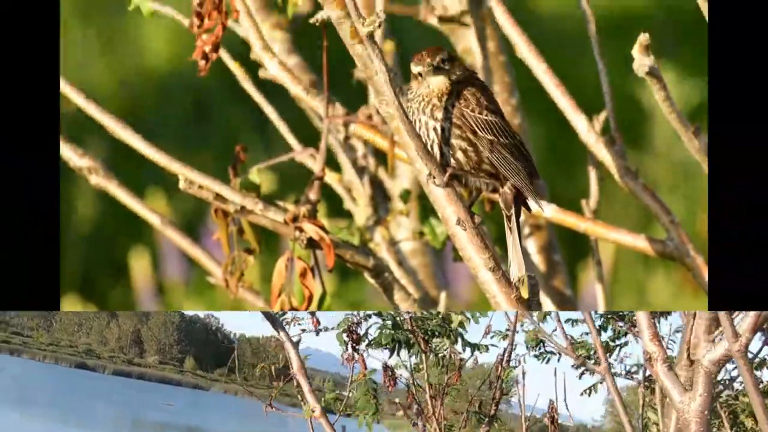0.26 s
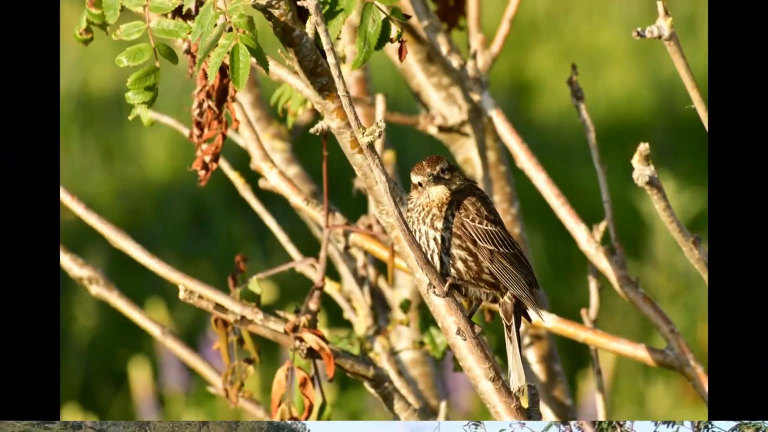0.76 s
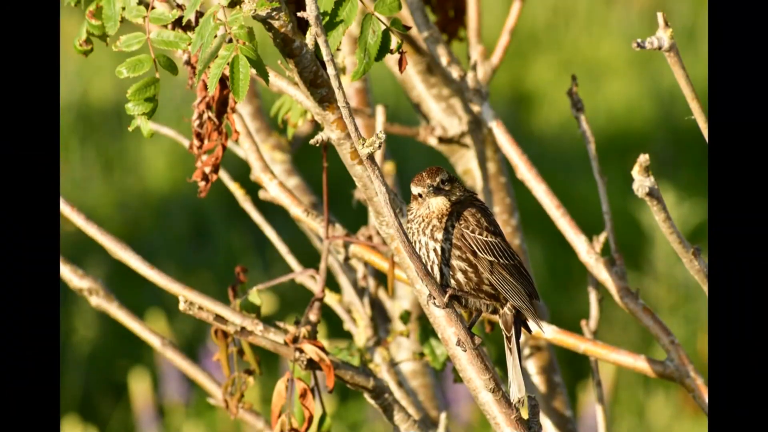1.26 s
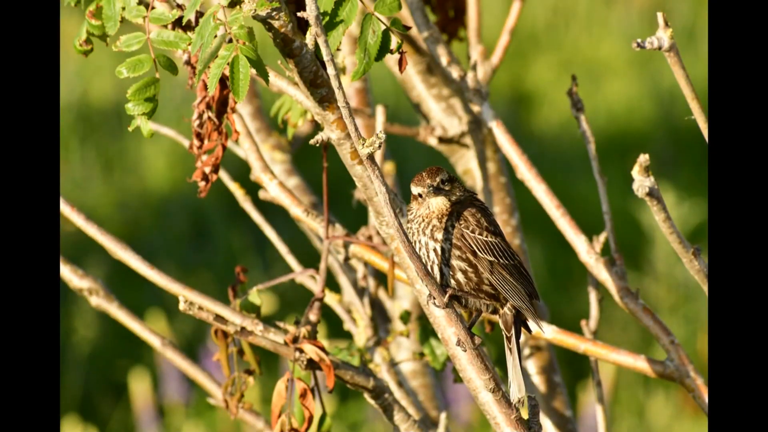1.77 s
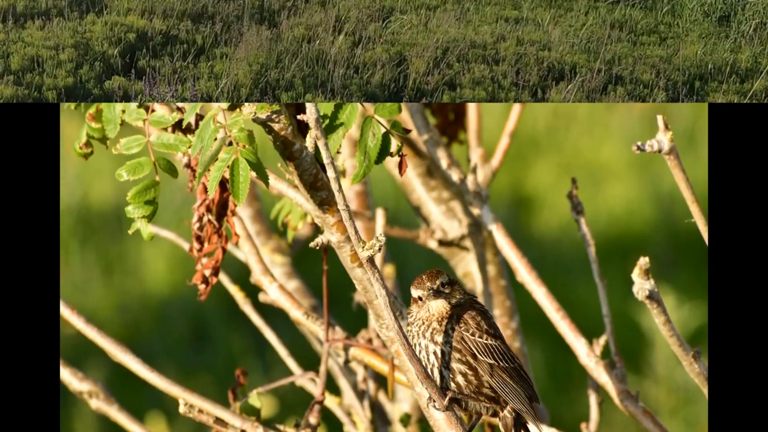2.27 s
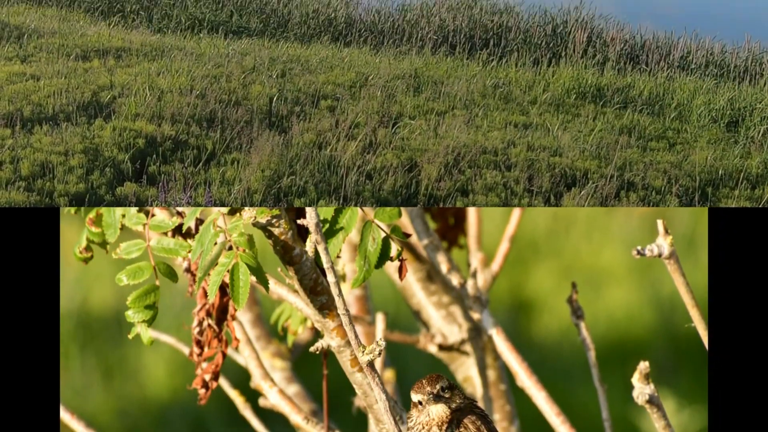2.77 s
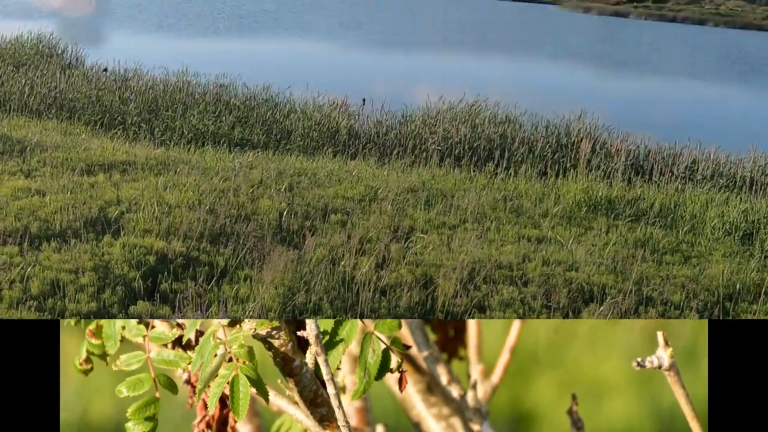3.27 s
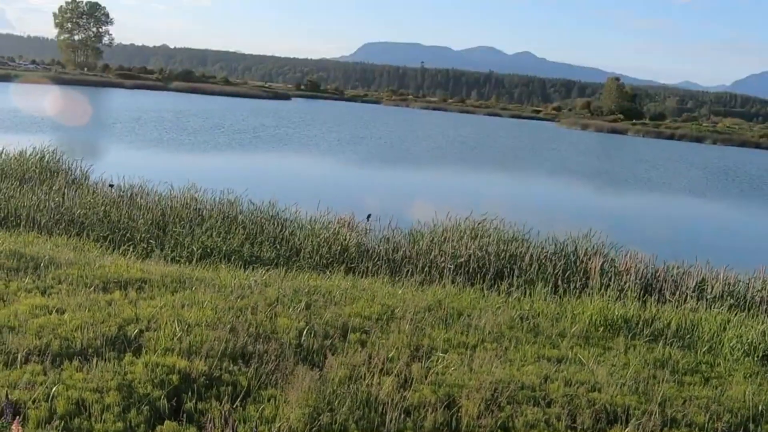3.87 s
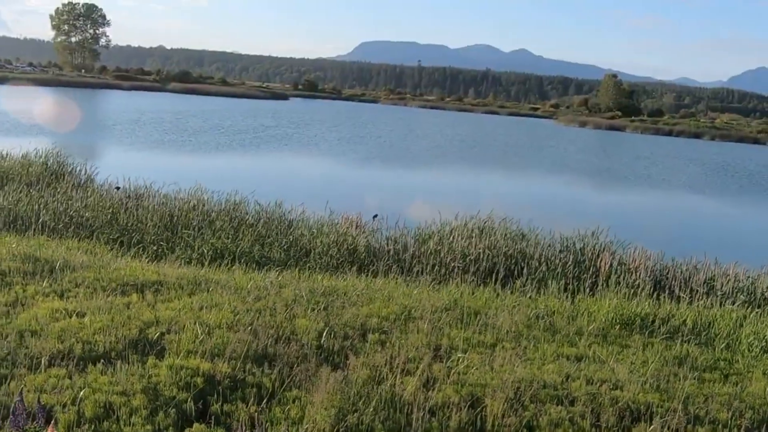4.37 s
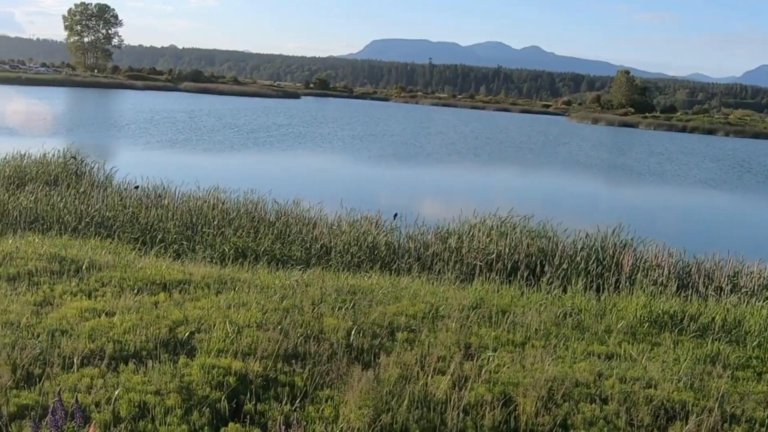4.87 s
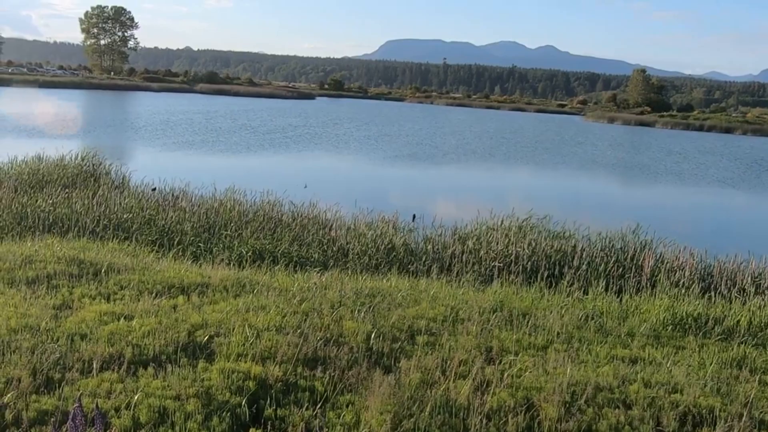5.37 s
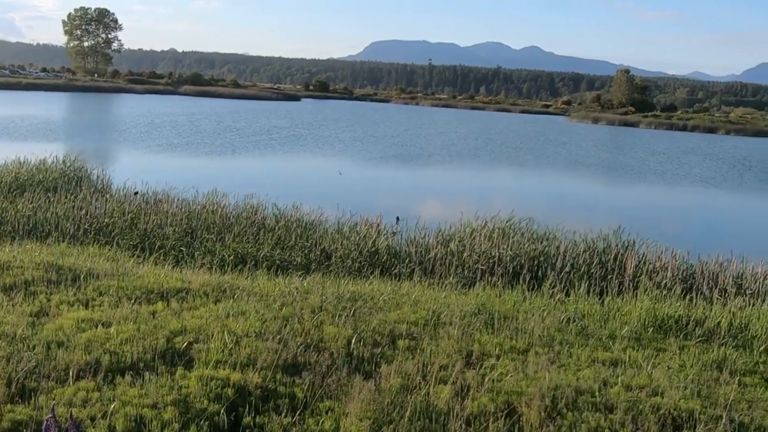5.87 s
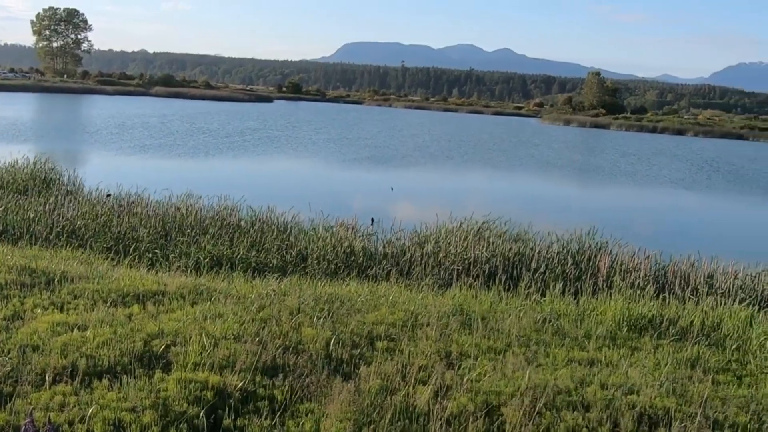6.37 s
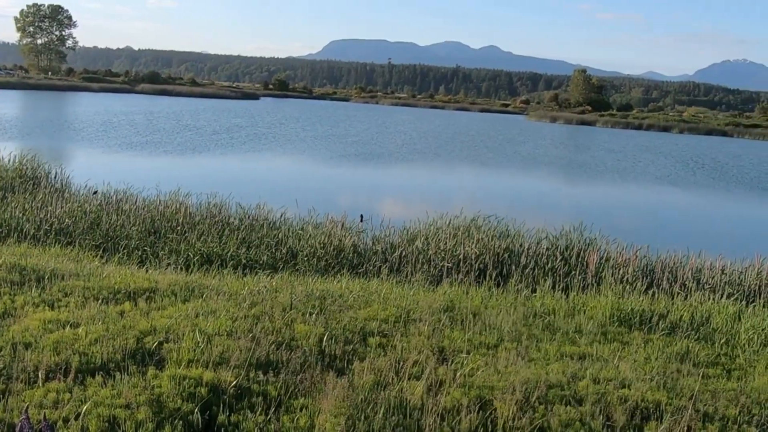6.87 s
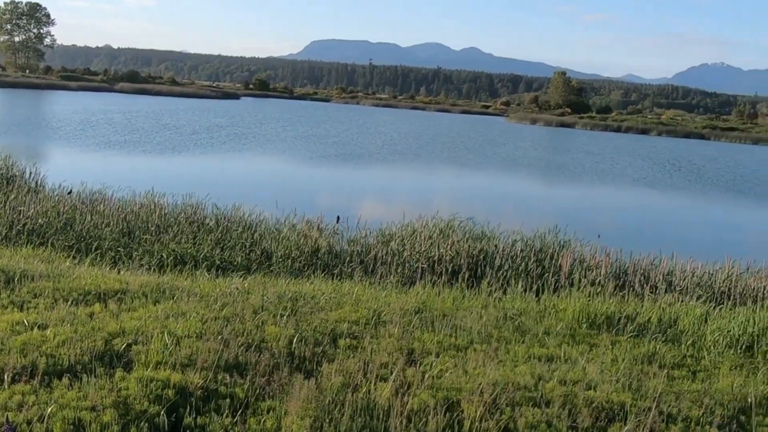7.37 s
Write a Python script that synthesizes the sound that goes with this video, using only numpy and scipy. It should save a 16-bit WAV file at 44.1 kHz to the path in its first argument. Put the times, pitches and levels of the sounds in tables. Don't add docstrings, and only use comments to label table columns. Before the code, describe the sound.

A low, steady haze of distant traffic and air, with slight wind rumble, lies under an open marsh. At 0 s a high bird note is dying away while far birds flick and pipe softly. From 0.15 s a close songbird begins quietly, sliding through arches, small drops and V-shaped whistles around 3 to 4 kHz, reaching full voice by 1.5 s and stopping near 2.65 s. Behind it, far birds sweep, chip, buzz and trill. A crow caws hoarsely at 2.5 and softer at 3.4 s. From 3.5 s the close bird restarts faintly: quick rise, steep plunge, held whistle, low blip, about three a second, quickening to over five and slightly lowering in pitch. A dull bump falls near 4.45 s. From 6 s to the 7.5 s end the song is piercing, with overload fizz, short echoes and a long tree-line tail; faint high far whistles close.

```python
import sys
import numpy as np
from scipy import signal
from scipy.fft import rfft, irfft, next_fast_len
from scipy.io import wavfile
from scipy.ndimage import uniform_filter1d, map_coordinates

SR = 44100
rng = np.random.default_rng(int(sys.argv[2]) if len(sys.argv) > 2 else 0)


def amp(db):
    return 10 ** (np.asarray(db, float) / 20)


def write(x):
    x = np.atleast_2d(x).T
    wavfile.write(sys.argv[1], SR, np.round(np.clip(x, -1, 1) * 32767).astype(np.int16))


N = 335601


def unit(x):
    return x / np.sqrt(np.mean(x ** 2) + 1e-20)


def along(points, hz):
    f, v = np.transpose(points)
    return np.interp(np.log(hz + 1), np.log(f + 1), v)


def wobble(rate, size):
    knots = rng.standard_normal(int(size * rate / SR) + 4)
    return map_coordinates(knots, [np.arange(size) * rate / SR])


def noise_pair():
    return rng.standard_normal((2, N))


def spread(pair, spectrum, alike):
    length = pair.shape[1]
    m = next_fast_len(length + 8192)
    hz = np.fft.rfftfreq(m, 1 / SR)
    turn = np.arccos(np.clip(along(alike, hz), -1, 1)) / 2
    coloured = rfft(pair, m) * amp(along(spectrum, hz))
    mid, side = irfft(coloured * [np.cos(turn), np.sin(turn)], m)[:, :length]
    return np.array([mid + side, mid - side])


# (pitch f/Hz, level/dB)
THROAT_FADE = [(2600, 3.6), (3600, -1.3), (4100, -5.5), (4800, -12.5), (6500, -30.5)]


def add_whistle(track, rows, partials, flutter_db, smooth_s=0.00064, push=0.9):
    s, hz, db = np.transpose(rows)
    t = np.arange(s[0] - .003, s[-1] + 0.0038, 1 / SR)
    level_s = np.r_[t[0], s, t[-1]]
    level_db = np.r_[db[0] - 25, db, db[-1] - 25]
    size = max(int(smooth_s * SR), 1)
    flutter = flutter_db * wobble(220, len(t))
    gain = uniform_filter1d(amp(np.interp(t, level_s, level_db) + flutter), size)
    hz = uniform_filter1d(np.interp(t, s, hz), size)
    turn = 2 * np.pi * (np.cumsum(hz) / SR + rng.random())
    throat_db = along(THROAT_FADE, hz) + 2.5e-5 * np.minimum(np.gradient(hz) * SR, 0)
    wave = np.cos(turn)
    for k, db_k in partials:
        wave = wave + amp(db_k + throat_db) * gain ** (push * (k - 1)) * np.cos(k * turn)
    part = track[round(t[0] * SR):][:len(t)]
    part += (gain * wave)[:len(part)]


# (f/Hz, level/dB per Hz)
HAZE_COLOUR = [(15, -74), (25, -37), (101, -13), (227, -12.5), (389, -0.5), (648, -14), (2010, -21),
               (2420, -22), (2850, -16), (3340, -11), (3930, -24.5), (6730, -31), (10100, -47),
               (11800, -66), (15500, -68)]
# (f/Hz, likeness 0-1)
HAZE_ALIKE = [(30, .999), (150, 0.98), (500, .997), (3000, 1), (9000, 1)]
# (f/Hz, level/dB)
MACHINE_HUM = [
    (101, -65),
    (152, -67),
]
# (t/s, level/dB)
WIND_RUMBLE = [(0.0, -60), (.5, -61), (.8, -70), (1.8, -78), (2.4, -66), (2.7, -72), (3.3, -84),
               (3.52, -58), (3.75, -65), (3.9, -60), (4.2, -60), (4.7, -65), (5.2, -69), (5.9, -68),
               (6.3, -62), (6.82, -58), (7.61, -72)]


def haze():
    roar = amp(-45 + 0.46 * wobble(2.7, N)) * unit(spread(noise_pair(), HAZE_COLOUR, HAZE_ALIKE))
    wind_colour = [(12, -32.5), (22, -5.0), (52, -1.5), (75, -29.5), (150, -95.5)]
    wind = unit(spread(noise_pair(), wind_colour, HAZE_ALIKE))
    wind_db = np.interp(np.arange(N) / SR, *np.transpose(WIND_RUMBLE))
    hum = np.zeros(N)
    for hz, db in MACHINE_HUM:
        drift = np.cumsum(1 + .02 * wobble(5, N)) / SR
        hum += amp(db + 2.7 * wobble(4.4, N)) * np.sin(2 * np.pi * hz * drift)
    return roar + hum + amp(wind_db) * wind


def earlier_song():
    b, a = signal.butter(2, [4050 / SR * 2, 4330 / SR * 2], "band")
    decay_db = -39.5 - 18 * np.arange(N) / SR
    return unit(signal.lfilter(b, a, rng.standard_normal(N))) * amp(decay_db)


# (t/s, level/dB)
FLICKS_AT = [
    (.04, -29),
    (.265, -29),
    (.493, -29),
    (.752, -37),
    (5.398, -36.5),
]
# (length t/s, start f/Hz, end f/Hz)
FLICK_GLIDE = (.023, 4900, 4150)
# (t/s, length t/s, start f/Hz, end f/Hz, level/dB)
FAR_WHISTLES = [(2.691, 0.077, 5140, 3840, -49), (3.22, .032, 3770, 3880, -46.5),
                (3.578, 0.039, 5200, 4900, -46), (3.624, 0.039, 3800, 3680, -38.5),
                (3.945, 0.12, 5200, 3830, -52), (4.418, .055, 5100, 4200, -37),
                (5.08, 0.065, 4950, 3600, -35), (5.252, .05, 5500, 3850, -35),
                (5.787, .09, 3190, 2506, -43), (4.685, 0.038, 2620, 3130, -45),
                (5.32, .065, 2217, 2850, -48.5), (5.631, 0.05, 2156, 2770, -49.5),
                (7.29, 0.092, 5750, 5620, -40), (7.447, 0.043, 5760, 5730, -37),
                (7.597, .026, 5750, 5720, -42.5)]


def far_whistles(far):
    calls = FAR_WHISTLES + [(s, *FLICK_GLIDE, db) for s, db in FLICKS_AT]
    for s, length, hz, end_hz, db in calls:
        rows = [(s, hz, db - 7.0),
                (s + 0.2 * length, .74 * hz + .26 * end_hz, db),
                (s + 0.62 * length, .24 * hz + .76 * end_hz, db - .5),
                (s + length, end_hz, db - 5)]
        add_whistle(far, rows, [], flutter_db=2)


def blur(x):
    t = np.arange(SR // 20) / SR
    smear = rng.standard_normal(len(t)) * amp(-60 * t / .05)
    return x + .35 * signal.fftconvolve(x, smear / np.linalg.norm(smear))[:N]


# (t/s, length t/s, f/Hz, level/dB)
PIPED_NOTES = [
    (0.068, .106, 2950, -34.5),
    (0.197, 0.028, 2727, -36),
    (0.29, .108, 2960, -33.5),
    (0.423, 0.024, 2720, -34.5),
    (.52, 0.104, 2845, -35),
    (0.657, 0.022, 2660, -39),
    (.788, 0.088, 2895, -36),
    (4.867, 0.049, 2760, -46),
    (5.194, 0.054, 2690, -41),
]


def far_pipes(far):
    for s, length, hz, db in PIPED_NOTES:
        rows = [(s, .9 * hz, db - 8.0),
                (s + 0.12 * length, .98 * hz, db),
                (s + .5 * length, hz, db),
                (s + 0.87 * length, .985 * hz, db),
                (s + length, .87 * hz, db - 5)]
        add_whistle(far, rows, [], flutter_db=.5)


# (multiple, level/dB at full voice)
SONG_OVERTONES = [(2, -20.5), (3, -38), (4, -56)]
# (start t/s, end t/s, first f/Hz, last f/Hz, peak level/dB)
ARCH_NOTES = [
    (.148, .2005, 3460, 3610, -16.5),
    (.528, .6016, 3160, 3287, -10),
    (.9234, .9997, 3007, 3100, -7),
    (1.2746, 1.3604, 2915, 3001, -4),
    (1.6228, 1.7156, 2834, 2962, -2.5),
    (1.975, 2.0705, 2838, 2935, -2.4),
    (2.3362, 2.4305, 2799, 2923, -2.5),
]
DROP_NOTES = [
    (.2085, .2405, 3455, 3266, -11),
    (.34, .369, 3760, 3670, -17),
    (.6065, .6206, 3240, 3200, -11.5),
    (.6211, .6415, 3140, 3030, -8),
    (1.0097, 1.0431, 3000, 2837, -11),
    (1.3659, 1.4013, 2893, 2735, -7),
    (1.7161, 1.754, 2875, 2700, -8),
    (2.0693, 2.1107, 2840, 2634, -6.5),
    (2.436, 2.478, 2800, 2640, -10.5),
]
FALL_NOTES = [
    (.312, .3385, 4253, 3953, -8),
    (1.096, 1.153, 3630, 3050, -3),
    (1.4402, 1.5091, 3637, 2987, -2.5),
    (1.7909, 1.8568, 3560, 2997, -1.5),
    (2.1471, 2.2145, 3572, 2903, 2),
    (2.5113, 2.5821, 3483, 2887, -1.5),
]
CLIMB_NOTES = [
    (.3886, .4195, 4027, 4167, -6.5),
    (1.1599, 1.2078, 3237, 3623, -3.5),
    (1.5166, 1.5664, 3190, 3613, -1),
    (1.8707, 1.9216, 3213, 3550, -1),
    (2.2254, 2.2743, 3194, 3545, 3),
    (2.5896, 2.6415, 3189, 3484, -1.1),
]
SOFT_FALL_NOTES = [
    (.706, .7655, 4080, 3250, -7.5),
]
SOFT_CLIMB_NOTES = [
    (.777, .824, 3510, 3930, -9.5),
]
# (share of length, share of way from first to last f, level/dB re peak)
ARCH_UNFOLDS = [(0, -0.15, -15.5), (.14, -0.19, -5), (.28, .55, -2.2), (.48, .93, -0.3), (.88, 1.01, -1.5),
                (1, 1.6, -18.5)]
DROP_UNFOLDS = [(0, 0.035, -15), (.27, 0.2, 0.1), (.85, 1.03, -2), (1, 1.14, -16.5)]
FALL_UNFOLDS = [(0, -.03, -15), (.13, .01, -4), (.26, .09, -1.2), (.42, .24, -.6), (.6, .6, -0.8),
                (.78, .88, -2), (.9, 1.01, -3), (1, 0.95, -19.5)]
CLIMB_UNFOLDS = [(0, -0.274, -17), (.1, -.14, -8), (.25, .02, -4), (.4, .27, -1.2), (.65, .65, -0.37),
                 (.89, 1.01, -1.5), (1, 1.1, -22)]
SOFT_FALL_UNFOLDS = [(0, 0, -22), (.1, .12, -15), (.3, .36, -12), (.5, .58, -1), (.8, .93, -1),
                     (.93, .98, -.5), (1, 1, -18)]
SOFT_CLIMB_UNFOLDS = [(0, -.1, -18), (.08, 0, -7), (.33, .3, -.5), (.62, .63, -2), (.76, .78, -11),
                      (1, 1, -18)]


def slurs(song):
    kinds = [(ARCH_NOTES, ARCH_UNFOLDS), (DROP_NOTES, DROP_UNFOLDS),
             (FALL_NOTES, FALL_UNFOLDS), (CLIMB_NOTES, CLIMB_UNFOLDS),
             (SOFT_FALL_NOTES, SOFT_FALL_UNFOLDS), (SOFT_CLIMB_NOTES, SOFT_CLIMB_UNFOLDS)]
    for notes, shape in kinds:
        for s, end, hz, last_hz, db in notes:
            rows = [(s + u * (end - s), hz + way * (last_hz - hz), db + rel) for u, way, rel in shape]
            add_whistle(song, rows, SONG_OVERTONES, flutter_db=.3, smooth_s=.003)


# (f/Hz, likeness 0-1)
SCATTER_ALIKE = [(2000, 0.84), (5000, 0.91), (10000, 0.37)]
# (f/Hz, level/dB per Hz)
BREATH_COLOUR = [(1200, -25), (2200, -3.5), (5500, -1), (8500, -12), (11500, -26), (13500, -41)]


def breath(song):
    effort = np.sqrt(np.abs(uniform_filter1d(song ** 2, int(.03 * SR))))
    return amp(-40) * effort ** 0.68 * unit(spread(noise_pair(), BREATH_COLOUR, SCATTER_ALIKE))


# (delay t/s, left level/dB, right level/dB)
RETURNS = [
    (.009, -21.5, -34),
    (0.0196, -21.5, -29),
    (.034, -35.5, -33.5),
]


def echoes(x):
    total = np.zeros((2, N))
    for s, left_db, right_db in RETURNS:
        total += amp([[left_db], [right_db]]) * np.pad(x, (round(s * SR), 0))[:N]
    return total


# (f/Hz, t60/s)
TREE_DECAY = [(2500, 2.52), (4000, 2.28), (7000, 1.5), (11000, 0.84)]


def trees(x):
    hz, t, z = signal.stft(rng.standard_normal((2, 3 * SR)), SR, nperseg=256)
    far_lines = amp(-60 * t / along(TREE_DECAY, hz)[:, None])
    reeds = 0.67 * amp(-60 * t / 0.07)
    trunks = amp(3 * rng.standard_normal(len(t)))
    wash = signal.istft(z * (far_lines + reeds) * trunks, SR, nperseg=256)[1]
    tail = spread(wash, [(1000, -4.5), (4000, -3.0), (8000, -0.5), (14000, -2)], SCATTER_ALIKE)
    late = np.pad(x, (150, 0))[None]
    return signal.fftconvolve(late, tail / np.linalg.norm(tail[0]), axes=1)[:, :N]


# (start f/Hz, end f/Hz)
SWEEP_GLIDE = (6150, 3850)
SWEEP_LEVELS = [-47, -38, -40, -36, -36, -34, -32, -33, -33, -31]


def far_sweeps(far):
    first_s, every_s, length_s = 1.045, .118, .037
    start_hz, end_hz = SWEEP_GLIDE
    for k, db in enumerate(SWEEP_LEVELS):
        s = first_s + k * every_s
        add_whistle(far, [(s, start_hz, db - 6), (s + length_s, end_hz, db)], [], flutter_db=4)


# (t/s, level/dB)
CHIPS_AT = [
    (1.058, -48),
    (1.135, -42),
    (1.157, -53.5),
    (1.278, -38.5),
    (1.3, -48),
    (1.425, -41.5),
    (1.45, -41),
    (1.572, -38),
    (1.598, -40.5),
]


def far_chips(far):
    for s, db in CHIPS_AT:
        for hz in (5550, 5100, 4650):
            add_whistle(far, [(s, hz, db), (s + .008, .975 * hz, db)], [], flutter_db=3)


# (t/s, length t/s, f/Hz, level/dB)
BUZZ_PATCHES = [
    (1.075, .035, 3950, -41),
    (1.2, .04, 4000, -37),
    (1.32, .06, 3850, -36),
    (1.485, .05, 3900, -33),
    (1.56, .03, 3950, -37),
    (1.67, .04, 3950, -37),
    (1.78, .045, 4150, -32),
    (1.92, .06, 4400, -32),
    (2.02, .035, 3800, -36),
]
BUZZ_BANDS = [-290, -20, 240]


def far_buzzes(far):
    for s, length, mid_hz, db in BUZZ_PATCHES:
        for hz in np.add(mid_hz, BUZZ_BANDS):
            rows = [(s, .98 * hz, db - 12), (s + length / 2, hz, db), (s + length, 1.01 * hz, db - 12)]
            add_whistle(far, rows, [], flutter_db=6)


CREST, TROUGH = .945, .995
# (f/Hz, level/dB per Hz)
FIZZ_COLOUR = [(6000, -40), (8500, -6), (11000, 0), (14500, -2), (16500, -10)]


def fizz(dry):
    hang_s = .04
    excess = np.maximum(np.abs(dry) - CREST, 0)
    over = np.abs(uniform_filter1d(excess, int(hang_s * SR), axis=1))
    hiss = unit(spread(noise_pair(), FIZZ_COLOUR, [(9000, .93)]))
    return amp(-21 + 3 * wobble(60, N)) * over * hiss


# (t/s, level/dB)
TRILLS_AT = [
    (2.352, -34.5),
    (2.648, -36),
    (2.966, -41.5),
    (3.325, -46.5),
    (3.735, -42),
]


def far_trills(far):
    for start_s, db in TRILLS_AT:
        for k in range(4):
            s = start_s + k * .0185
            add_whistle(far, [(s, 5170, db - 2), (s + .012, 5060, db - 1)], [], flutter_db=4)
            add_whistle(far, [(s + .013, 4550, db - 12), (s + .017, 4200, db - 12)], [], flutter_db=2)


# (t/s from its start, f/Hz, level/dB, warble depth 0-1, mouth f/Hz)
CAW_COURSE = [
    (0, 335, -58, 0, 1700),
    (.026, 451, -44, 0, 1950),
    (.09, 441, -44, .006, 2000),
    (.135, 415, -42, .03, 2080),
    (.22, 384, -41, .05, 1940),
    (.31, 354, -43, .052, 1800),
    (.335, 290, -52, .06, 1480),
]
# (t/s, level/dB, mouth shift f/Hz)
CAWS_AT = [
    (2.53, -2, -20),
    (3.396, -5, 0),
]


def crow():
    warble_hz, rasp_db, narrows = 46, 45, 6
    out, t = np.zeros(N), np.arange(N) / SR
    for start, level_db, shift_hz in CAWS_AT:
        s, *columns = np.transpose(CAW_COURSE)
        s = s + start
        hz, db, warble, mouth_hz = [np.interp(t, s, column) for column in columns]
        beat = 2 * np.pi * np.cumsum(warble_hz * (1 + .15 * wobble(25, N))) / SR
        turn = 2 * np.pi * np.cumsum(hz * (1 + warble * np.sin(beat) + .009 * wobble(90, N))) / SR
        width_hz = np.maximum(.65 - narrows * warble, .2) * hz
        stack = np.zeros(N)
        for k in range(3, 7):
            chest = 1 / (1 + ((k * hz - 1300) / 190) ** 2)
            mouth = 1 / (1 + ((k * hz - mouth_hz - shift_hz) / width_hz) ** 2)
            stack += np.sin(k * turn) * (chest * amp(-300 * warble) + mouth)
        rasp = rasp_db * warble * np.cos(beat) + 2.4 * wobble(70, N)
        out += amp(db + level_db + rasp) * stack * (t > s[0]) * (t < s[-1])
    return out


# (t/s of steepest fall, held t/s, held f/Hz, plunge level/dB, end level/dB)
PLUNGE_NOTES = [(3.5265, .059, 3510, -32, -11.5), (3.8615, .054, 3500, -25, -8),
                (4.1897, .057, 3490, -12, -3.5), (4.4601, 0.061, 3473, -19.5, -5.5),
                (4.7216, .059, 3420, -14, -3.5), (4.965, 0.06, 3380, -10, -4),
                (5.204, 0.064, 3378, -15.5, -8.5), (5.4611, 0.059, 3372, -10.5, -3.5),
                (5.679, .065, 3238, -8, -3.3), (5.875, 0.062, 3026, -3, -4.5),
                (6.0636, .066, 2935, 2.2, -3.5), (6.249, 0.067, 2906, 1.6, -3.5),
                (6.4346, 0.07, 2876, 1.55, -5.5), (6.616, .071, 2776, 0.4, -4.5),
                (6.7984, 0.071, 2770, 3, -6), (6.9823, 0.07, 2768, 1.9, -8), (7.166, .071, 2776, 1.1, -6.5)]
# (t/s from steepest fall, share of way from held pitch to top)
PLUNGE_COURSE = [(-.021, .95), (-.016, 1), (-.012, .99), (-.008, .92), (-.004, .74), (-.001, .51),
                 (.001, .28), (.003, .145)]
PLUNGE_LEVELS = [-37, -27, -21, -14.5, -5.5, 0.6, -2.5, -6]
# (t/s, share of way to top)
SETTLE_COURSE = [(.006, .09), (.011, .054), (.02, .022), (.038, 0)]


def plunge(song, s, held, hz, db, end_db):
    top_hz = 6750 - 0.75 * (3500 - hz)
    rows = []
    for (dt, share), rel in zip(PLUNGE_COURSE, PLUNGE_LEVELS):
        rows.append((s + dt, hz + share * (top_hz - hz), db + rel * hz / 3300))
    dip_db = -12.5 + 0.5 * db
    for dt, share in SETTLE_COURSE:
        swell = ((dt - .006) / (held - .014)) ** .32
        rows.append((s + dt, hz + share * (top_hz - hz), dip_db + (end_db - dip_db) * swell))
    end = s + held
    rows += [(end - .008, 1.003 * hz, end_db), (end - .005, 1.02 * hz, end_db),
             (end - .002, 1.146 * hz, end_db - 3.0), (end + 0.00087, 1.1 * hz, end_db - 19.5)]
    add_whistle(song, rows, SONG_OVERTONES, flutter_db=.75, smooth_s=.001)


def blip(song, held_end, held_hz, db):
    gap_s, length_s = .002, .0155
    on, hz = held_end + gap_s, 2505 + .71 * (held_hz - 2780)
    rows = [(on, 0.946 * hz, db - 11.0), (on + 0.005, 1.01 * hz, db - 1),
            (on + length_s - .005, hz, db - 0.5), (on + length_s, 0.968 * hz, db - 10)]
    add_whistle(song, rows, SONG_OVERTONES, flutter_db=1.2)


# (start t/s, end t/s, start f/Hz, end f/Hz, peak level/dB)
RISE_NOTES = [(3.819, 3.828, 4250, 6200, -33.5), (4.149, 4.159, 4260, 6200, -25.5),
              (4.415, 4.43, 4200, 6020, -28), (4.678, 4.688, 4180, 5730, -17.5),
              (4.922, 4.9324, 4120, 5780, -14.5), (5.16, 5.173, 4050, 5950, -19),
              (5.414, 5.4293, 4130, 5870, -18.5), (5.6345, 5.6462, 4130, 5500, -6.5),
              (5.8284, 5.8395, 3910, 5380, -3.5), (6.02, 6.0327, 3864, 5150, 1.7),
              (6.204, 6.2185, 3820, 5210, 1.5), (6.389, 6.403, 3730, 5065, 1.7),
              (6.568, 6.587, 3563, 4840, 2), (6.7514, 6.77, 3646, 4986, 2.5), (6.932, 6.952, 3590, 5010, 3),
              (7.1195, 7.1355, 3560, 4760, .2)]


def rises(song):
    for s, end, hz, end_hz, db in RISE_NOTES:
        length = end - s
        mid_hz = hz + (.42 - 12 * length) * (end_hz - hz)
        rows = [(s - .003, .985 * hz, db - 17),
                (s, hz, db - 10),
                (s + .3 * length, .6 * hz + .4 * mid_hz, db - 4.0),
                (s + .5 * length, mid_hz, db - .6),
                (s + .75 * length, .64 * mid_hz + .36 * end_hz, db),
                (s + .89 * length, .2 * mid_hz + .8 * end_hz, db - .6),
                (end, 1.06 * end_hz, db - 14.5)]
        add_whistle(song, rows, SONG_OVERTONES, flutter_db=-0.25, smooth_s=.001)


BLIP_LEVELS = [-31.5, -17.5, -13.5, -14, -11.5, -13.5, -16, -10, -9.5, -14, -15, -14.5, -14.5, -12, -15,
               -15, -18]


def syllables(song):
    rises(song)
    for (s, held, hz, db, end_db), blip_db in zip(PLUNGE_NOTES, BLIP_LEVELS):
        plunge(song, s, held, hz, db, end_db)
        blip(song, s + held, hz, blip_db)


# (t/s, f/Hz, level/dB)
BUMP = [
    (4.43, 170, -56),
    (4.47, 160, -46),
    (4.54, 150, -56),
]


def far_thud(far):
    add_whistle(far, BUMP, [], flutter_db=3)


def singer():
    song = np.zeros(N)
    slurs(song)
    syllables(song)
    return song


def neighbours():
    far = np.zeros(N)
    for voice in (far_whistles, far_pipes, far_sweeps, far_chips, far_buzzes, far_trills, far_thud):
        voice(far)
    return far


def scene():
    song = singer()
    far = blur(neighbours() + amp(.8) * crow())
    air = breath(song)
    tail = trees(amp(-18.0) * song + amp(-1.5) * air[0] + amp(-14.5) * far)
    return song + air + echoes(song) + far + tail + earlier_song() + haze()


def low_pass(x):
    return signal.sosfilt(signal.butter(12, 15710, fs=SR, output="sos"), x)


def record(dry):
    limit = np.where(dry > 0, CREST, TROUGH)
    clipped = dry / (1 + np.abs(dry / limit) ** 40) ** (1 / 40)
    b, a = signal.butter(1, 22 / SR * 2, "high")
    mix = signal.lfilter(b, a, clipped + fizz(dry))
    return low_pass(mix)


dry = scene()
out = record(dry)
write(out)
```